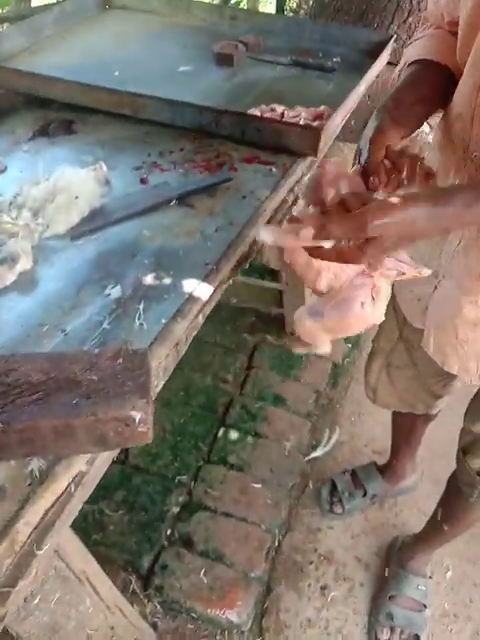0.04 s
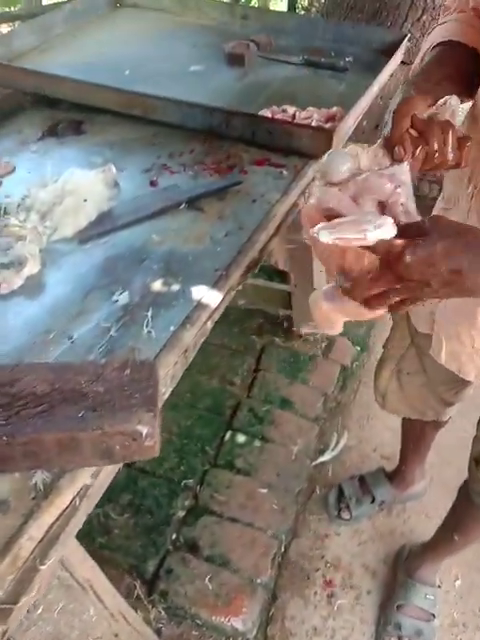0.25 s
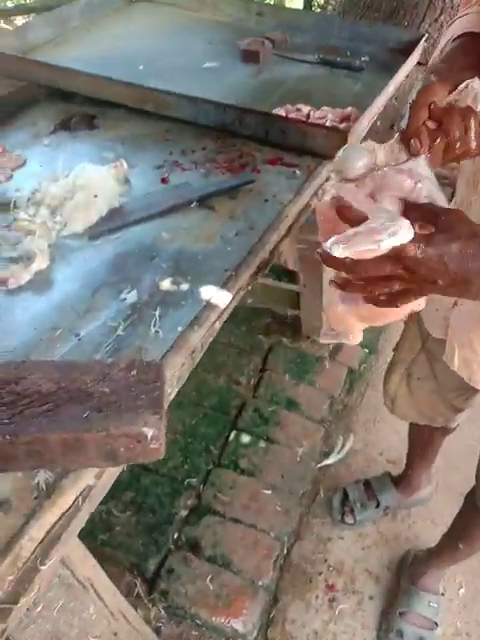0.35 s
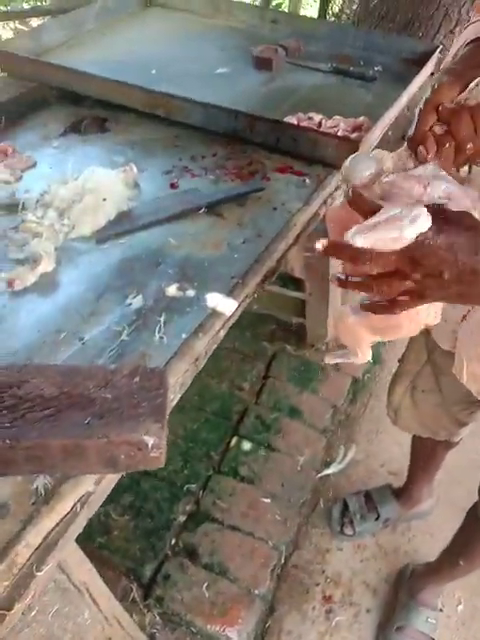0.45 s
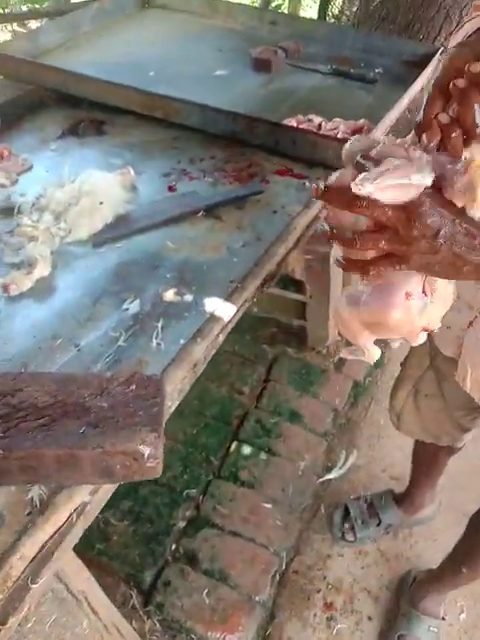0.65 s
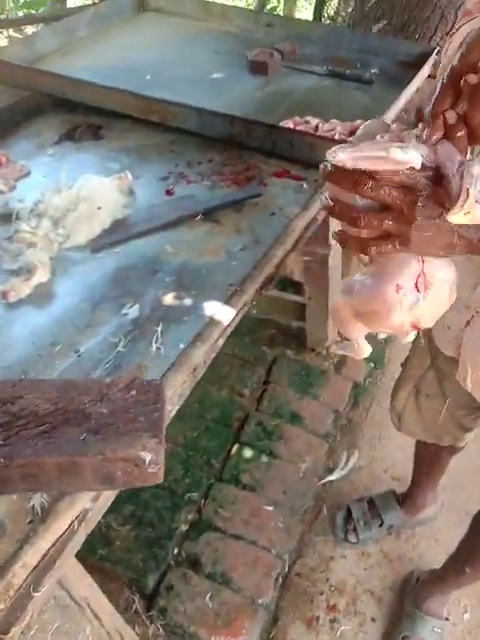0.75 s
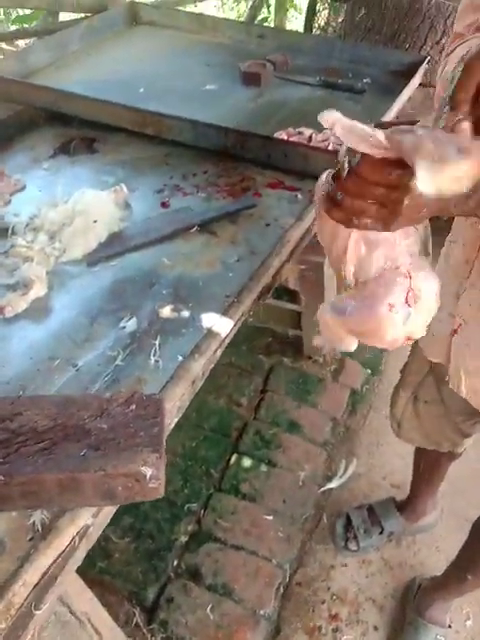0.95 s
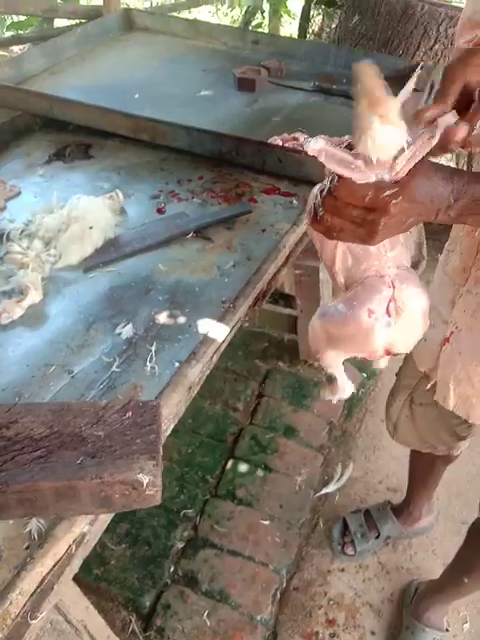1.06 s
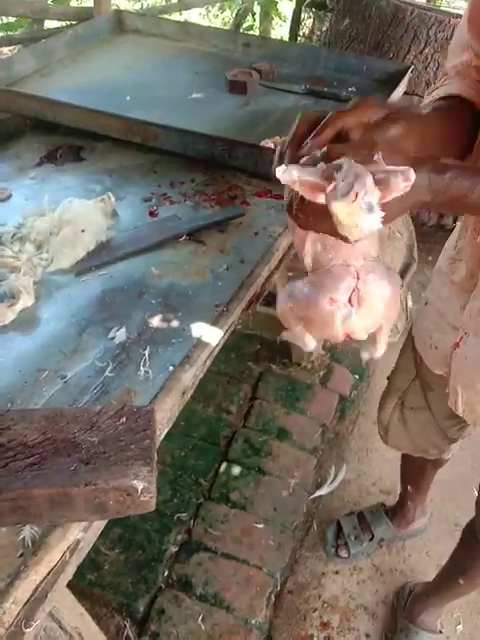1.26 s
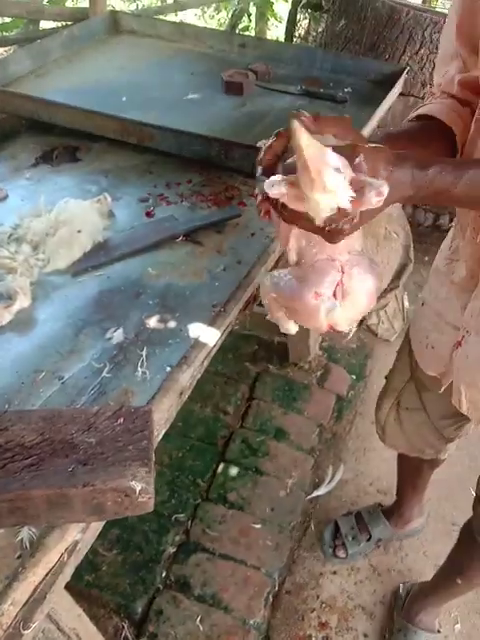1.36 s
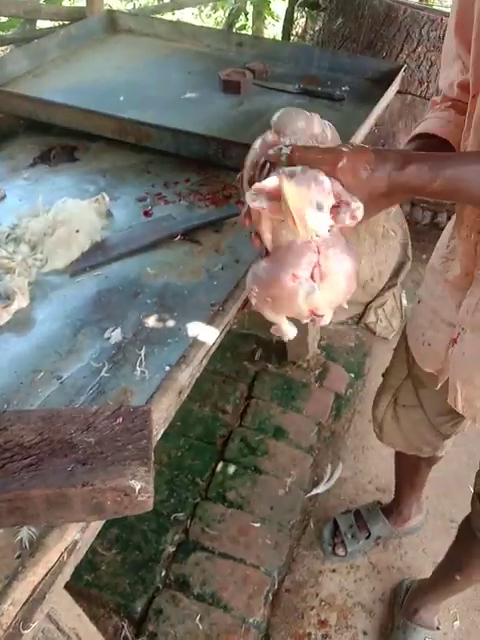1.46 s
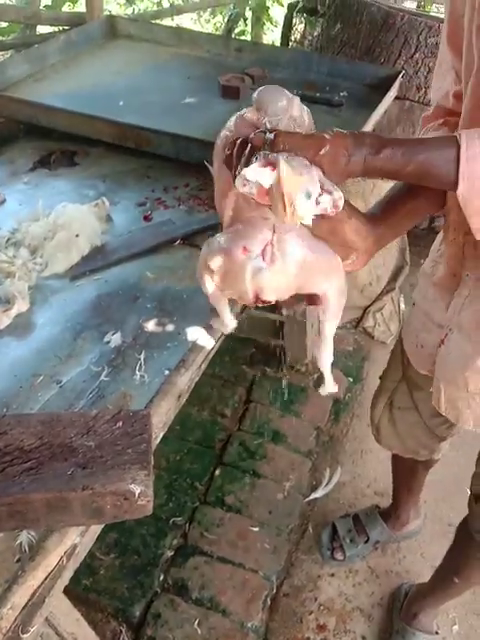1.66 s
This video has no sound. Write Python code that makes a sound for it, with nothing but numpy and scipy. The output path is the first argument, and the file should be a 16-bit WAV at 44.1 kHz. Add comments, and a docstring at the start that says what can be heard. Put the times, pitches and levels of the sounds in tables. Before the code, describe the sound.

A crow caws once, long and rattling, in an open yard; a fainter crow answers. Close to the microphone, skin is pulled off a plucked bird with a rip, wet squelches and tiny pops over quiet outdoor rumble.

```python
"""Crows over a yard, wet skin pulled close by

A near crow (pulsed harmonic voice through throat filters) gives one long harsh caw; a far one answers.
Close by, wet skin is pulled off a plucked bird: grain noise rips and squelches, damped sines pop and
gliding sines squeak. Soft low sine bumps and faint distant hoots join in.
Filtered noise lies under it all as a quiet outdoor rumble, swelling at the end; the sound is mono."""
import sys
import numpy as np
from scipy import signal
from scipy.fft import rfft, irfft
from scipy.io import wavfile
from scipy.ndimage import uniform_filter1d

SR = 44100
rng = np.random.default_rng(int(sys.argv[2]) if len(sys.argv) > 2 else 0)


def int16_out(signal):
    """Quantize to a 16-bit WAV file."""
    q = np.round(np.clip(np.atleast_2d(signal).T, -1, 1) * 32767)
    wavfile.write(sys.argv[1], SR, q.astype(np.int16))


N = 74970
T = np.arange(N) / SR

# Colours: all (frequency [Hz], relative level [dB])
# outdoor air and low rumble
AIR_COLOUR = [(25, -34.5), (50, -22), (80, -0.5), (150, 4), (260, -2.5), (430, -17.5), (590, -2.5),
              (760, -17.5), (1080, -18), (1240, -6.5), (1400, -19.5), (2000, -20.5), (3200, -26.5),
              (4700, -16.5), (6000, -24.5), (8000, -38), (13000, -40), (15500, -35.5)]
RUMBLE_COLOUR = [(60, -31), (145, 12.5), (240, -11), (390, 4), (520, -16.5), (850, -10.5), (1300, -40),
                 (3000, -48.5)]
# throats: far crow; near crow's lower and upper resonance, second syrinx side
FAR_THROAT = [(400, -10.5), (600, -30), (900, -49), (1100, -25.5), (1250, -1), (1400, -9), (1700, 0),
              (1900, -6.5), (2200, -17.5), (2600, -23), (4600, -36), (7000, -66)]
LOWER_THROAT = [(350, -48.5), (590, -16.5), (730, -15.5), (900, -14), (1090, -10), (1230, 5), (1360, 0),
                (1620, 1.5), (1790, -2), (2100, -45), (2800, -61)]
UPPER_THROAT = [(1400, -58.5), (1750, -7.5), (1950, 6), (2400, 0), (2680, -11), (3000, -29), (3350, -24.5),
                (4200, -14.5), (5050, -8), (6000, -21.5), (6700, -38), (7500, -26), (9500, -77),
                (15000, -56)]
SECOND_THROAT = [(400, -15), (600, -21.5), (1050, -20), (1215, -5.5), (1500, -8), (1800, -8), (2250, 4.5),
                 (2420, 2), (3000, -11.5), (3600, -25), (4800, -12), (6000, -14.5), (7400, -28.5),
                 (12000, -54)]
# skin: long rip, snaps in wet pockets, bright fizz, crack of a pop
RIP_COLOUR = [(880, -58), (1500, -17.5), (1970, -13), (3380, -12), (3650, -5.5), (4390, 2.5), (5720, -1),
              (6750, -12), (10700, -15), (13500, -21.5), (15500, -14.5)]
POCKET_COLOUR = [(500, 8), (6200, -4), (7600, -2), (9000, -26), (15000, -17.5)]
FIZZ_COLOUR = [(400, -5), (1000, 6.5), (2000, 9), (3500, -1), (6000, 0.5), (8000, -8.5), (11000, -1.5),
               (13500, -14), (15300, -6.5)]
CRACK_COLOUR = [(700, -38), (2000, -3), (3300, -7.5), (5500, -2), (7500, -17), (10000, -16), (13500, -14.5),
                (15500, -16)]

# outdoor air, then rumble: (time [s], level [dB])
AIR_DB = [(0, -56.5), (.3, -55), (1.0, -56.5), (1.5, -56.5), (1.7, -59.5)]
RUMBLE_DB = [(1.5, -65.5), (1.58, -50), (1.7, -52.5)]
# distant hoots: (start [s], length [s], peak [dB], start pitch [Hz], end pitch [Hz])
HOOTS = [(-.02, 0.054, -45.5, 560, 575.4), (1.1, 0.098, -55.5, 385, 329), (1.56, 0.032, -54, 387.3, 395)]
# low bumps: (start [s], length [s], peak [dB], mean pitch [Hz])
BUMPS = [(0.093, 0.021, -47, 88.8), (0.24, 0.027, -52, 96.4), (0.794, .14, -45, 68),
         (1.044, 0.063, -60, 89.1), (1.196, 0.037, -43.5, 80.5)]
# far caw: (time [s], pitch [Hz], level before trim [dB])
FAR_CAW = [(1.15, 570.5, -93), (1.19, 574, -55), (1.28, 584.5, -53), (1.38, 572.3, -53), (1.46, 557.5, -52),
           (1.55, 540, -53), (1.7, 567.7, -52)]
# long rip: (time [s], dry level [dB])
RIP_DB = [(.195, -98), (.203, -45), (.222, -33.5), (.248, -38.5), (.262, -42.5), (.285, -43.5), (.31, -63)]
# squelches: (start [s], time to release [s], dry level [dB], pocket centre [Hz], fizz re pocket [dB])
SQUELCHES = [(0.08, 0.023, -59, 4500, -7.5), (0.131, .022, -46, 4270, -5), (0.912, 0.051, -50, 4840, -17),
             (0.951, 0.0076, -40.5, 2530, -15), (0.968, 0.022, -39, 4630, -23),
             (0.992, 0.013, -48.5, 2920, 2.5), (1.0, 0.012, -54.5, 833, -14),
             (1.011, 0.0046, -39, 7000, -12), (1.024, 0.02, -41.5, 5746, -5),
             (1.073, 0.011, -46, 5370, -10.5), (1.114, 0.022, -52.5, 6300, -26),
             (1.256, 0.011, -57, 2420, -31), (1.268, 0.0071, -46.5, 3600, -42),
             (1.28, 0.016, -44, 4440, -36), (1.303, 0.01, -42, 3400, -6.5),
             (1.328, 0.021, -39.5, 5300, -6.5), (1.361, .026, -44, 4880, -3.5),
             (1.402, 0.075, -64.5, 4560, -16), (1.489, 0.014, -46, 4110, -35),
             (1.522, 0.013, -56, 4540, -27), (1.538, 0.04, -60, 5000, -24)]
# wet pops: (time [s], level before band-pass [dB], starting pitch [Hz], ring t60 [s])
POPS = [(.927, -33.5, 5600, 0.011), (.9515, -26, 6240, 0.0051), (0.9608, -20.5, 5430, 0.0035),
        (0.964, -36, 4900, 0.0066), (0.977, -36.5, 5690, 0.019), (0.9798, -20.5, 5650, 0.0069),
        (0.983, -19, 3980, 0.006), (0.9875, -34, 3220, 0.013), (1.033, -19, 6800, 0.0019),
        (1.11, -38, 6040, 0.0093), (1.1295, -41, 5930, 0.013), (1.2826, -34, 4320, 0.007),
        (1.2853, -25, 5310, 0.0063), (1.3088, -16, 3290, 0.0066), (1.3132, -17, 4150, 0.0092),
        (1.3174, -9, 5830, 0.002), (1.3219, -20, 4400, 0.0066), (1.333, -27, 4900, .012),
        (1.343, -27, 5100, 0.0033), (1.376, -22.5, 5900, 0.0057), (1.555, -43, 5340, 0.012),
        (1.569, -43, 5400, 0.0069), (1.68, -43, 6500, 0.00085)]
# air squeezed through wet skin: (start [s], length [s], dry peak [dB], start pitch [Hz], end pitch [Hz])
SQUEAKS = [(1.0664, 0.0017, -34, 4376, 4550), (1.07, 0.0041, -29.5, 4554, 4610),
           (1.074, 0.015, -36, 4466, 4690), (1.374, 0.003, -24.5, 4276, 4450),
           (1.379, 0.0033, -27, 4400, 4590)]
# near caw pitch: (time [s], pitch [Hz])
CAW_HZ = [(.28, 439.4), (.35, 452), (.44, 491.5), (.52, 551.5), (.6, 558.7), (.655, 551.9), (.72, 518.3),
          (.8, 478), (.92, 440)]
# near caw throat resonances: (time [s], lower level [dB], upper level before trim [dB])
CAW_DB = [(.28, -55, -55), (.32, -48, -46), (.4, -45, -39.5), (.48, -44.5, -39.5), (.51, -38, -39),
          (.6, -38, -38.5), (.66, -36.5, -38.5), (.72, -38, -42), (.78, -41, -49), (.86, -44, -58)]
# near caw clear tone: (time [s], power share [0-1])
CAW_CLEAR = [(.3, 0), (.45, 0.91), (.52, 0.57), (.62, 0.34), (.7, 0.87), (.78, 0.85), (.9, 0.43)]
# other side of the syrinx: (time [s], pitch [Hz], level re upper resonance before trim [dB])
SECOND_SIDE = [(.3, 556, -3), (.37, 568.8, -2), (.44, 596, -3.5), (.57, 608, -7.5), (.66, 587.6, -7),
               (.75, 555, -10.5), (.88, 512, -12)]

AIR_FLICKER_DB = 1.3  # rms
FAR_TRIM_DB, FAR_CLEAR_SHARE = -2, 0.28
UPPER_TRIM_DB, SECOND_TRIM_DB, UPPER_CLEAR_FACTOR = -2.5, -2.5, 0.13
CAW_FADE_S, LOWER_RELEASE_S = 0.03, 0.11  # the lower resonance lingers at the end
FLUTTER_PEAK_PITCH_HZ = 96  # mean rattle rate at the highest pitch
FLUTTER_JITTER, PITCH_JITTER = 0.035, 0.011  # rms fractions
TONE_FLUTTER, RASP_FLUTTER = 0.55, 0.33  # linear depth, exponential depth
GRAINS_PER_S, GRAIN_SPREAD_DB = 5400, 4.5
SQUELCH_Q, SQUELCH_ATTACK_S, SQUELCH_RELEASE_S = 2.95, 0.0086, 0.0088
POP_RISE_PER_S, POP_ATTACK_S, CRACK_DB, CRACK_S = 14.5, 0.0001, -11, 0.0015
POP_BAND_HZ = [2030, 8640]
YARD_T60_S, UPPER_T60_S, HAND_T60_S = 0.53, 0.22, 0.19  # the treble dies sooner in the yard
CROW_WET_DB, FAR_WET_DB, UPPER_WET_DB, HAND_WET_DB = -2.5, -2.5, -6, -11.5
CUTOFF_HZ = 15700


def from_db(db):
    """Decibels to gain."""
    return 10 ** (np.asarray(db) / 20)


def rms_one(x):
    """Scale to unit power."""
    return x / np.sqrt(np.mean(x ** 2) + 1e-20)


def in_time(rows):
    """Interpolate each column of a curve at every sample."""
    s, *columns = np.transpose(rows)
    return [np.interp(T, s, c) for c in columns]


def within(rows, fade_s):
    """One during a curve, Gaussian fades before and after."""
    outside_s = np.maximum(0, np.maximum(rows[0][0] - T, T - rows[-1][0]))
    return np.exp(-(outside_s / fade_s) ** 2)


def colour(x, points):
    """Shape by a spectrum, log-frequency interpolation; unit power."""
    hz, db = np.transpose(points)
    f = np.maximum(np.fft.rfftfreq(N, 1 / SR), 1)
    gain = from_db(np.interp(np.log(f), np.log(hz), db))
    return rms_one(irfft(rfft(x) * gain, N))


def drift(rate_hz):
    """Smooth random wander, unit rms: low-passed noise."""
    f = np.fft.rfftfreq(N, 1 / SR)
    return rms_one(irfft(rfft(rng.standard_normal(N)) / (1 + (f / rate_hz) ** 2), N))


def yard(x, wet_db, t60_s):
    """Add diffuse reverberation: an exponentially dying noise tail of unit energy."""
    t = T[:N // 2]
    tail = rng.standard_normal(len(t)) * from_db(-60 * t / t60_s) * (1 - np.exp(-t / 0.0017))
    tail /= np.sqrt(np.sum(tail ** 2))
    return x + from_db(wet_db) * signal.fftconvolve(x, tail)[:N]


def harmonics(hz):
    """Twenty equally strong harmonics on a moving pitch; unit power."""
    phase = 2 * np.pi * np.cumsum(hz) / SR
    return rms_one(sum(np.cos(k * phase) for k in np.arange(1, 21)))


def whistles(rows, waver):
    """Short gliding sines under Gaussian swells, pitch wavering by an rms fraction."""
    out = np.zeros(N)
    for s, length, db, start_hz, end_hz in rows:
        hz = np.interp(T, [s, s + length], [start_hz, end_hz]) * (1 + waver * drift(590))
        swell = np.exp(-(2 * (T - s) / length - 1) ** 2)
        out += from_db(db) * swell * np.sin(2 * np.pi * np.cumsum(hz) / SR)
    return out


def outdoors():
    """Filtered noise of slightly flickering level, plus low rumble that swells late."""
    flicker = from_db(AIR_FLICKER_DB * drift(13))
    air = from_db(in_time(AIR_DB)[0]) * colour(rng.standard_normal(N) * flicker, AIR_COLOUR)
    rumble = from_db(in_time(RUMBLE_DB)[0]) * colour(rng.standard_normal(N), RUMBLE_COLOUR)
    return air + rumble


def hoots():
    """Faint distant hoots: gliding low sines."""
    return whistles(HOOTS, waver=0.019)


def bumps():
    """Soft low sines of wandering pitch under half-sine swells."""
    out = np.zeros(N)
    for s, length, db, hz in BUMPS:
        swell = np.sin(np.pi * np.clip((T - s) / length, 0, 1))
        phase = 2 * np.pi * np.cumsum(hz * (1 + 0.098 * drift(30))) / SR
        out += from_db(db) * swell * np.sin(phase)
    return out


def syrinx(hz, clear_share):
    """Fluttering harmonic tone mixed with a jittery rasp, both chopped by one rattle."""
    rattle_hz = FLUTTER_PEAK_PITCH_HZ * hz / hz.max() * (1 + FLUTTER_JITTER * drift(50.1))
    rattle = 2 * np.pi * np.cumsum(rattle_hz) / SR
    tone = harmonics(hz * (1 + 0.003 * drift(37.2)))
    tone = rms_one(tone * (1 + TONE_FLUTTER * np.cos(rattle)))
    rasp = harmonics(hz * (1 + PITCH_JITTER * drift(292) + 0.098 * np.sin(rattle)))
    rasp = rms_one(rasp * np.exp(RASP_FLUTTER * np.cos(rattle)))
    # one click per rattle cycle
    knocks = rms_one(np.diff(np.floor(rattle / (2 * np.pi)), prepend=0))
    rough = rms_one(rasp + from_db(-2.5) * knocks)
    clear_share = np.clip(clear_share, 0, 1)
    return np.sqrt(clear_share) * tone + np.sqrt(1 - clear_share) * rough


def throat(voice, points):
    """Colour a voice by throat resonances and even out its short-term level."""
    x = colour(voice, points)
    return x / np.sqrt(uniform_filter1d(x * x, size=2000) + 1e-9)


def far_crow():
    """The same kind of voice through a duller throat, with yard reverberation."""
    hz, db = in_time(FAR_CAW)
    voice = throat(syrinx(hz, FAR_CLEAR_SHARE), FAR_THROAT)
    caw = from_db(db + FAR_TRIM_DB) * voice * within(FAR_CAW, CAW_FADE_S)
    return yard(caw, FAR_WET_DB, YARD_T60_S)


def grains():
    """Dense one-sample snaps of random size, sign and time; unit power."""
    size_db = GRAIN_SPREAD_DB * np.minimum(rng.exponential(1, N), 4)
    sizes = from_db(size_db) * rng.choice([-1, 1], N)
    return rms_one(sizes * (rng.random(N) < GRAINS_PER_S / SR))


def tearing():
    """One long rip, then and around it squelches: snaps ringing in wet pockets under bright fizz."""
    out = from_db(in_time(RIP_DB)[0]) * within(RIP_DB, 0.005) * colour(grains(), RIP_COLOUR)
    snaps, fizz = colour(grains(), POCKET_COLOUR), colour(grains(), FIZZ_COLOUR)
    for s, length, db, hz, fizz_db in SQUELCHES:
        attack = np.clip((T - s) / SQUELCH_ATTACK_S, 0, 1)
        release = np.exp(-np.maximum(T - s - length, 0) / SQUELCH_RELEASE_S)
        b, a = signal.iirpeak(hz, SQUELCH_Q, fs=SR)
        # two resonators in series
        pocket = rms_one(signal.lfilter(b, a, signal.lfilter(b, a, snaps)))
        out += from_db(db) * attack * release * (pocket + from_db(fizz_db) * fizz)
    return out


def pops():
    """Bursting pockets: a noise crack and a short damped sine whose pitch first rises."""
    out, crack = np.zeros(N), colour(rng.standard_normal(N), CRACK_COLOUR)
    for s, db, hz, t60 in POPS:
        t = np.clip(T - s, 0, 0.05)
        phase = 2 * np.pi * hz * t * (1 + POP_RISE_PER_S * t * np.exp(-t / 0.006))
        ring = np.sin(phase) * from_db(-60 * t / t60)
        burst = ring + from_db(CRACK_DB) * crack * np.exp(-t / CRACK_S)
        attack = 1 - np.exp(-t / POP_ATTACK_S)
        out += from_db(db) * attack * burst * (T - s < 0.05)
    return signal.sosfilt(signal.butter(2, POP_BAND_HZ, "band", fs=SR, output="sos"), out)


def squeaks():
    """Air squeezed through wet skin: very short gliding sines."""
    return whistles(SQUEAKS, waver=0.047)


def hands():
    """Skin sounds with a short, weak reverberation."""
    return yard(tearing() + pops() + squeaks(), HAND_WET_DB, HAND_T60_S)


def near_crow():
    """Both syrinx sides arch in pitch; the upper resonance dies away as the beak closes."""
    hz, = in_time(CAW_HZ)
    clear, = in_time(CAW_CLEAR)
    second_hz, second_db = in_time(SECOND_SIDE)
    lower_db, upper_db = in_time(CAW_DB)
    lower = from_db(lower_db) * throat(syrinx(hz, clear), LOWER_THROAT)
    upper_voice = throat(syrinx(hz, UPPER_CLEAR_FACTOR * clear), UPPER_THROAT)
    upper = from_db(upper_db + UPPER_TRIM_DB) * upper_voice
    second_voice = throat(harmonics(second_hz * (1 + 0.00684 * drift(80))), SECOND_THROAT)
    second = from_db(upper_db + second_db + SECOND_TRIM_DB) * second_voice
    calling = within(CAW_DB, CAW_FADE_S)
    lingering = (T > CAW_DB[-1][0]) * within(CAW_DB, LOWER_RELEASE_S)
    low_part = yard(lower * np.maximum(calling, lingering), CROW_WET_DB, YARD_T60_S)
    high_part = yard((upper + second) * calling, UPPER_WET_DB, UPPER_T60_S)
    return low_part + high_part


def scene():
    """Background, hands and crows, alike in both channels."""
    mono = outdoors() + hoots() + bumps() + far_crow() + hands() + near_crow()
    return np.array([mono, mono])


def record(dry):
    """Steep elliptic low-pass cuts the top."""
    return signal.sosfilt(signal.ellip(12, 0.1, 70, CUTOFF_HZ, fs=SR, output="sos"), dry)


dry = scene()
out = record(dry)
int16_out(out)
```